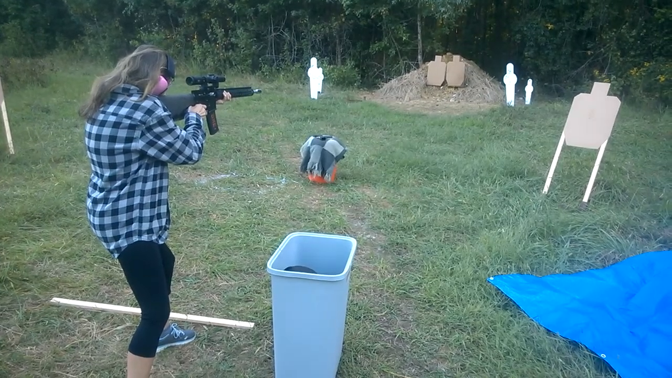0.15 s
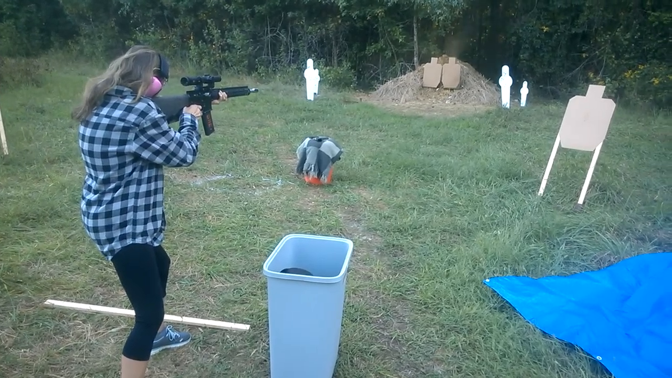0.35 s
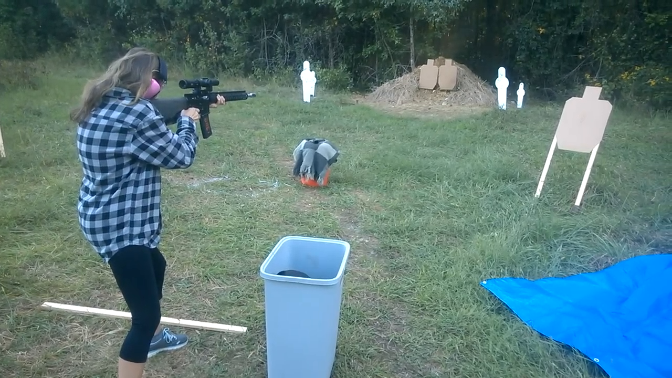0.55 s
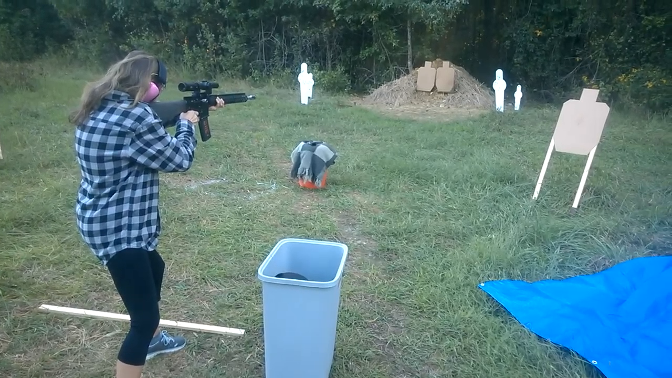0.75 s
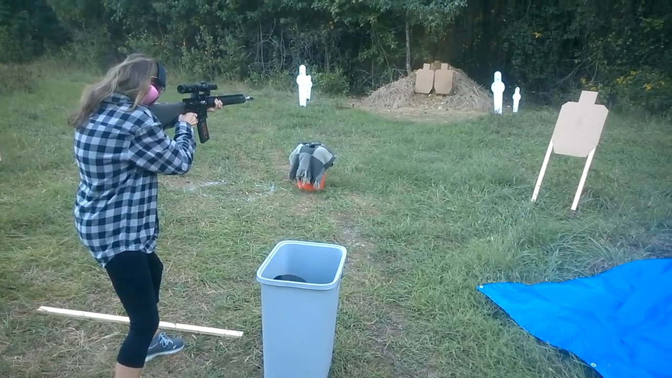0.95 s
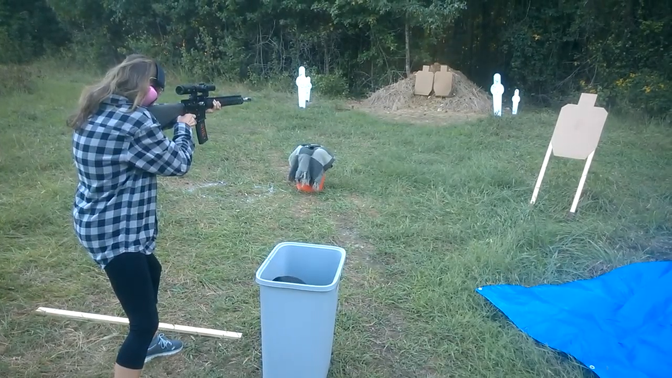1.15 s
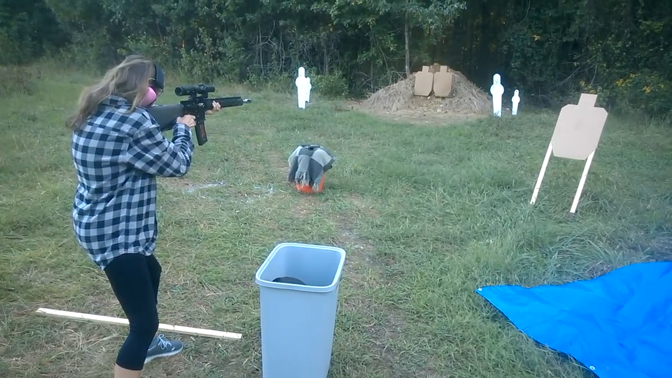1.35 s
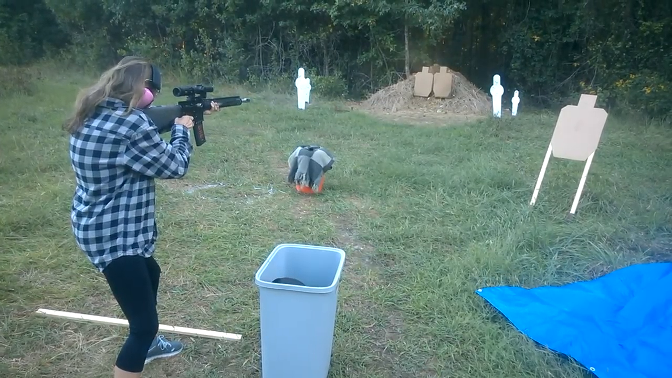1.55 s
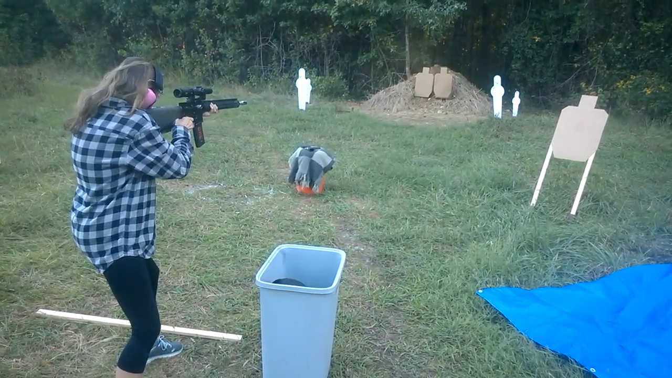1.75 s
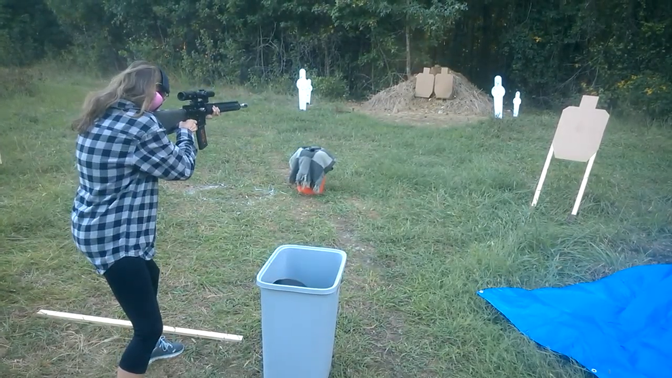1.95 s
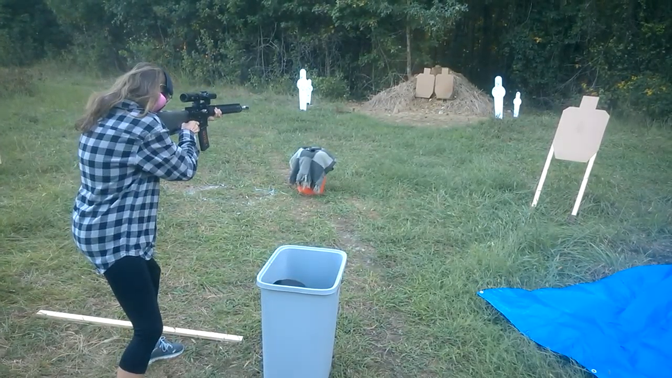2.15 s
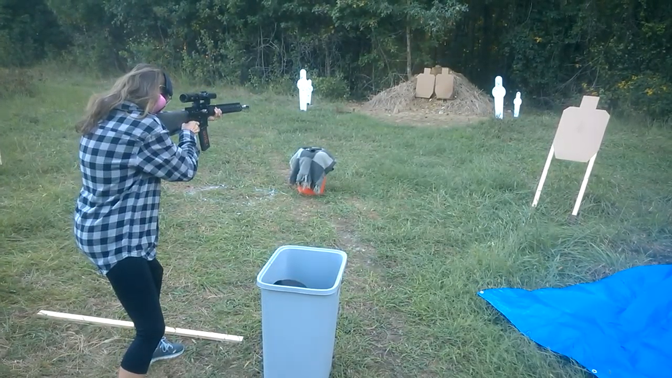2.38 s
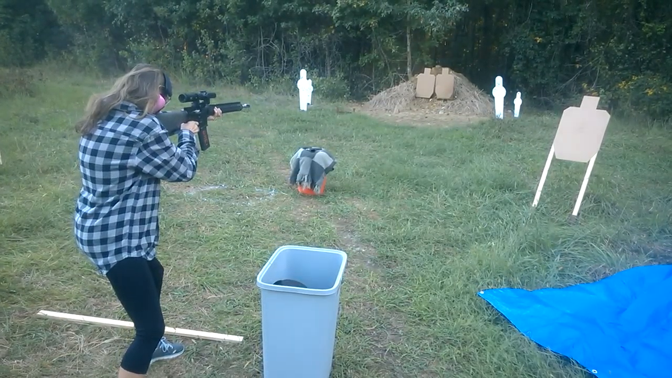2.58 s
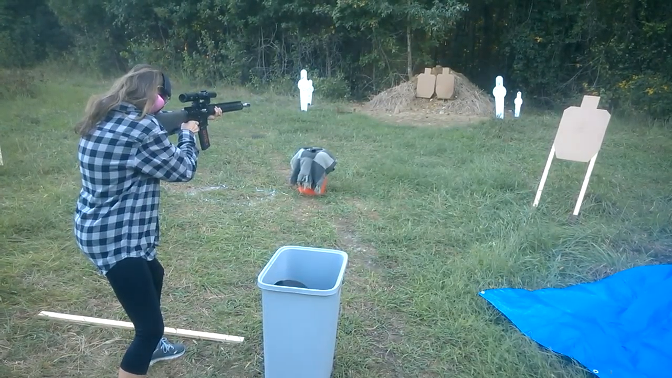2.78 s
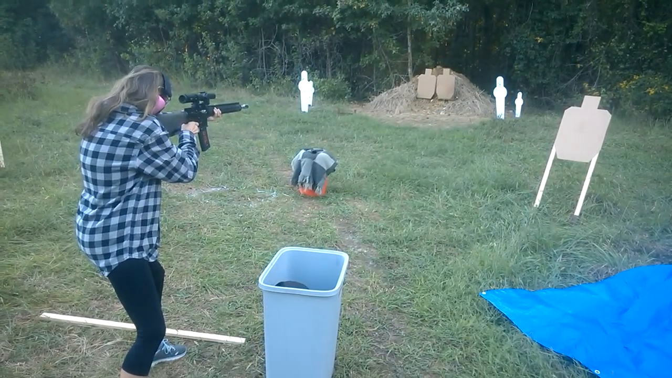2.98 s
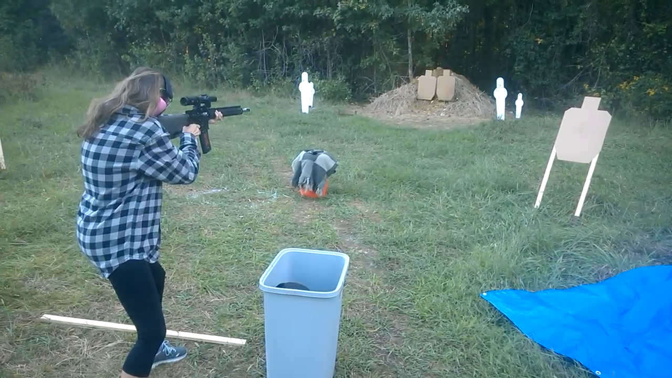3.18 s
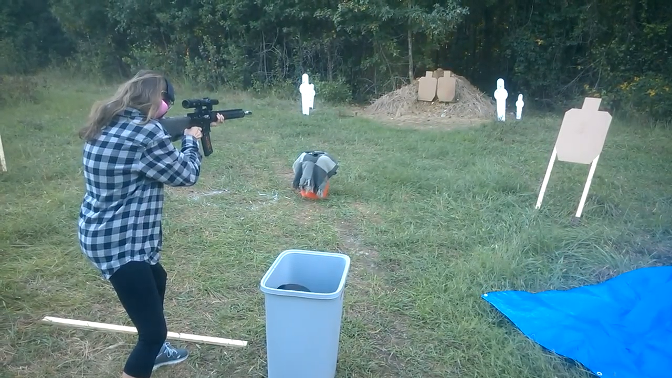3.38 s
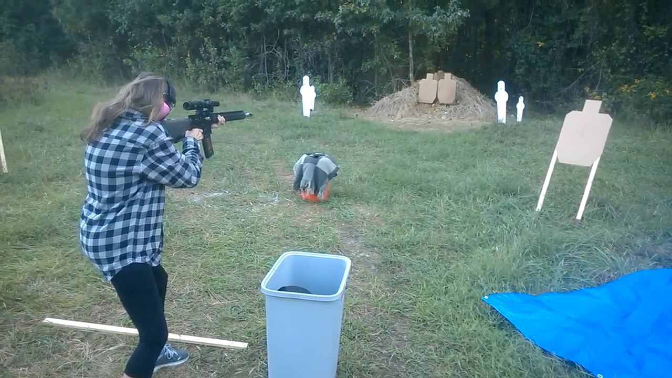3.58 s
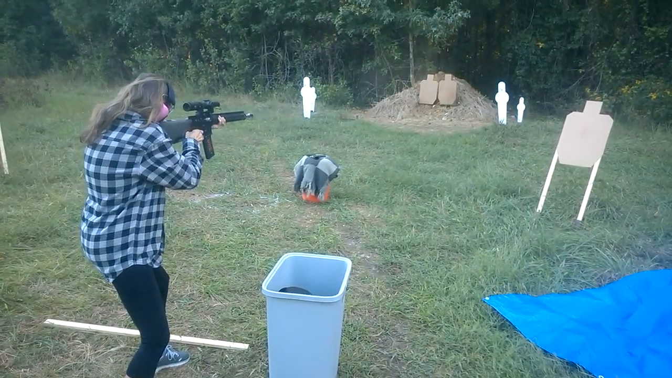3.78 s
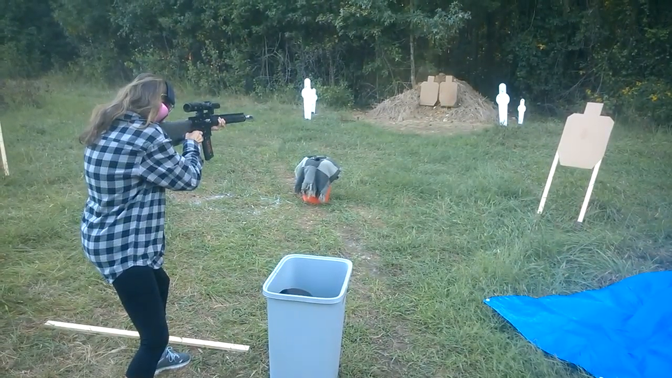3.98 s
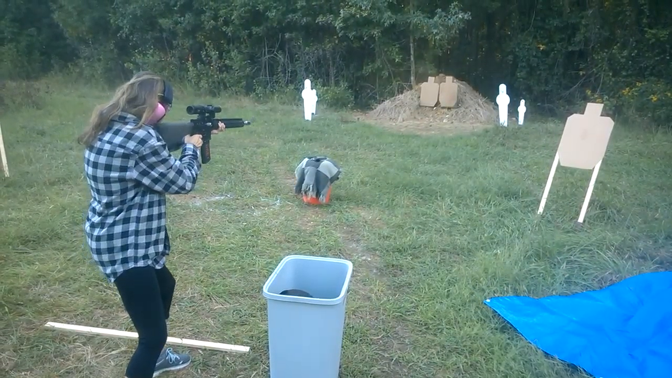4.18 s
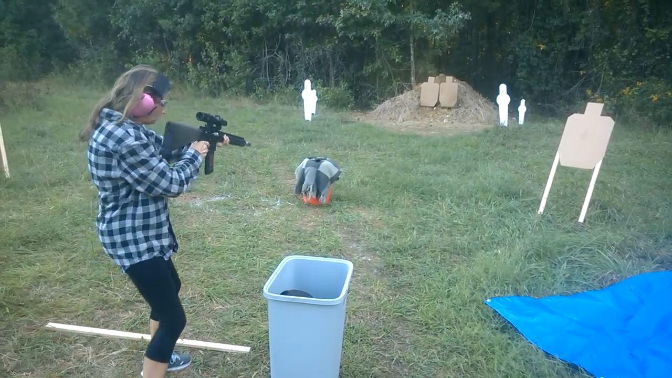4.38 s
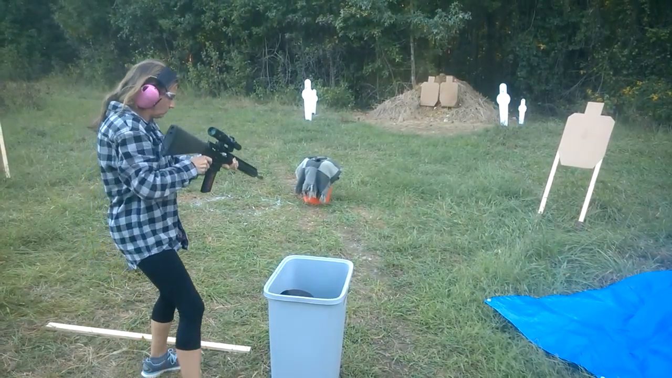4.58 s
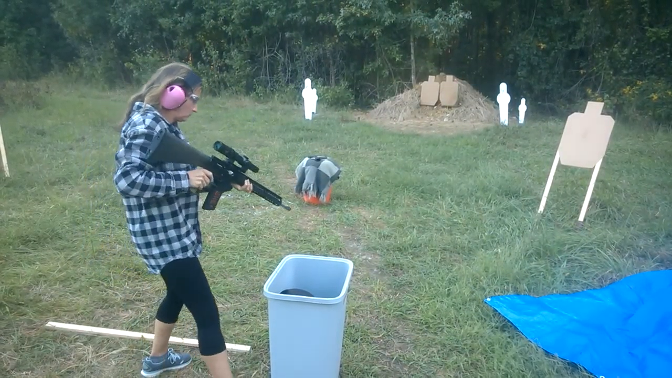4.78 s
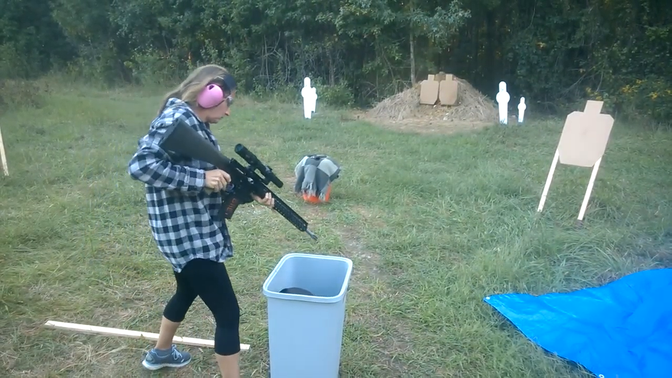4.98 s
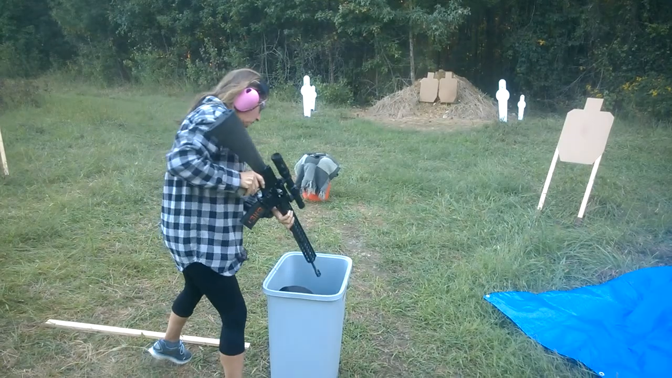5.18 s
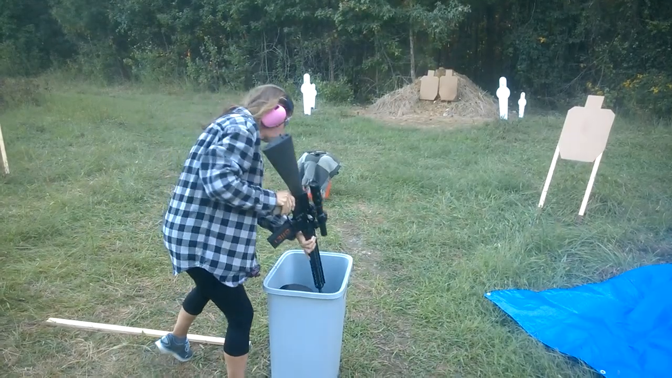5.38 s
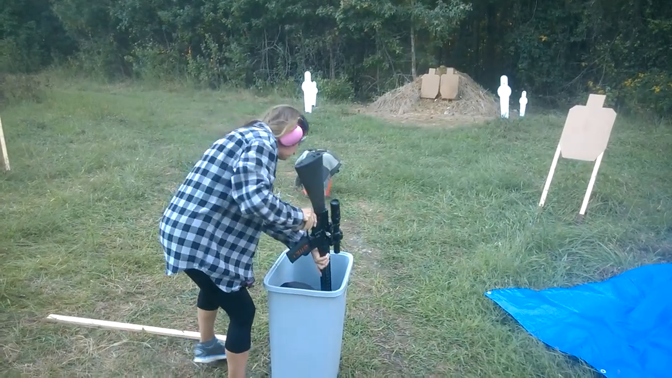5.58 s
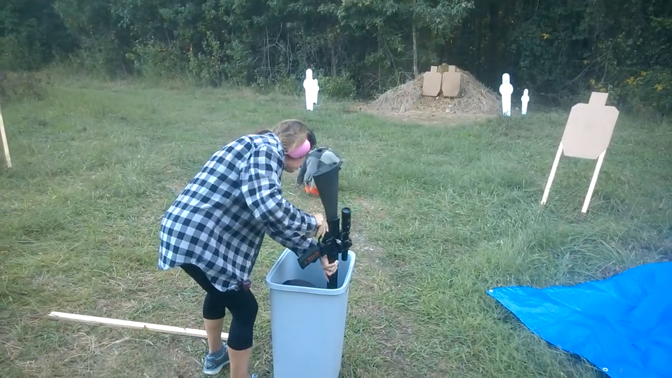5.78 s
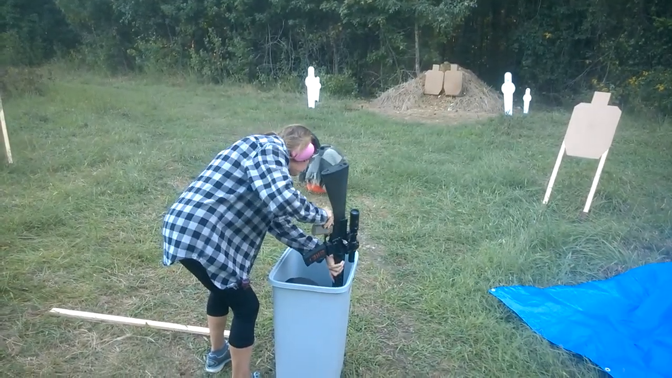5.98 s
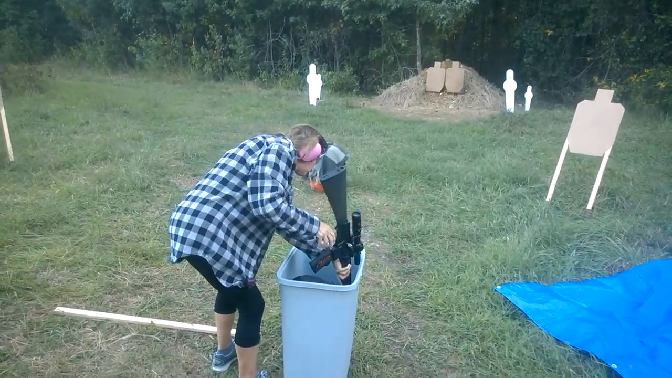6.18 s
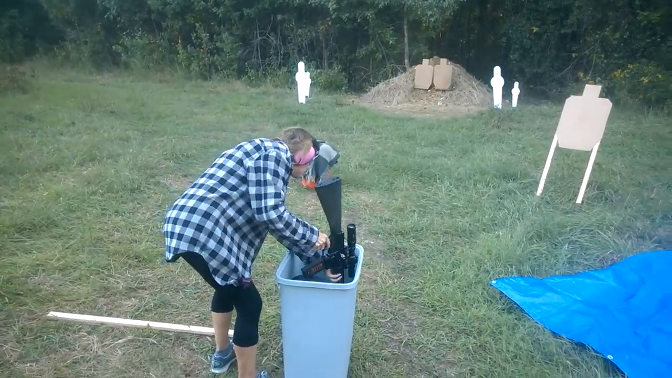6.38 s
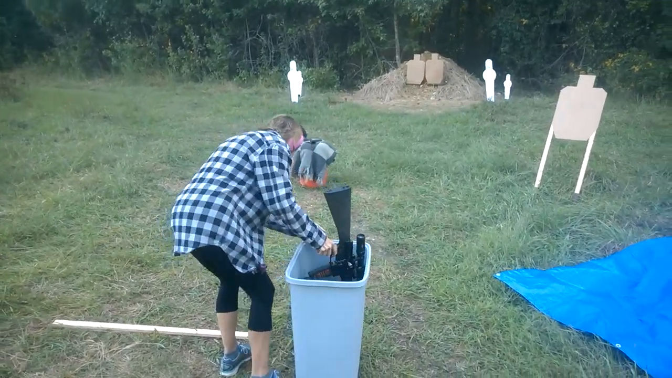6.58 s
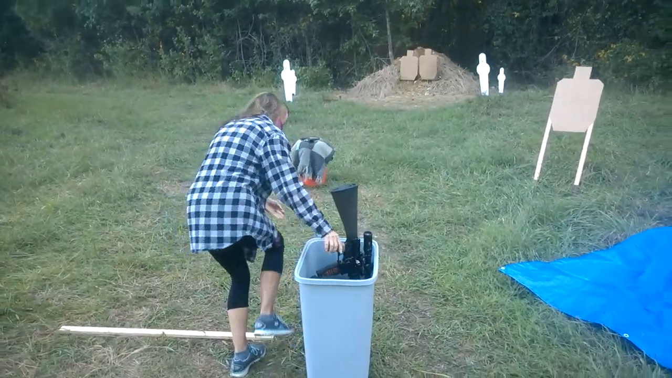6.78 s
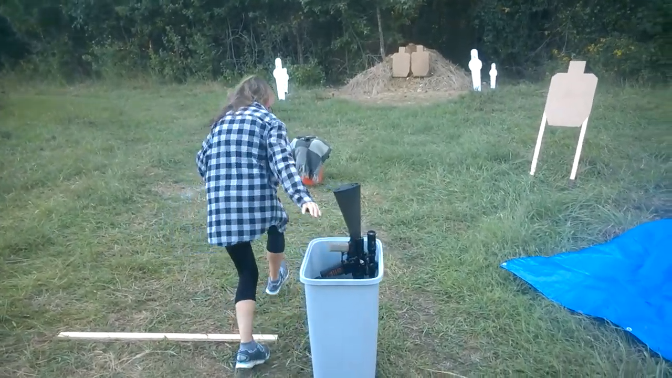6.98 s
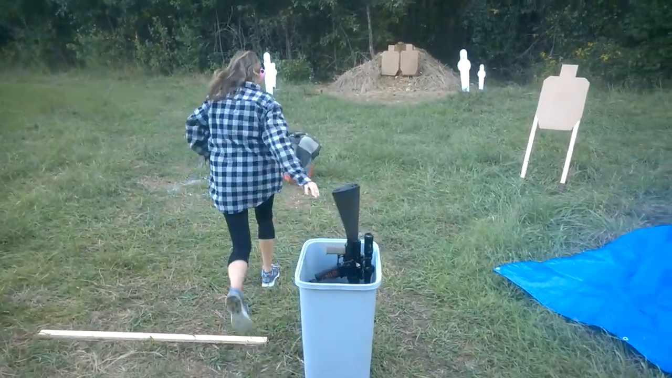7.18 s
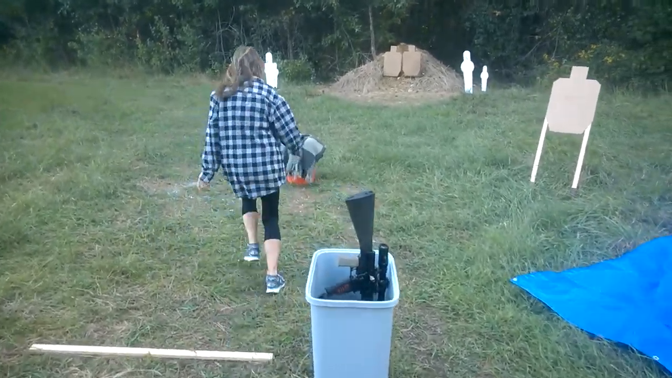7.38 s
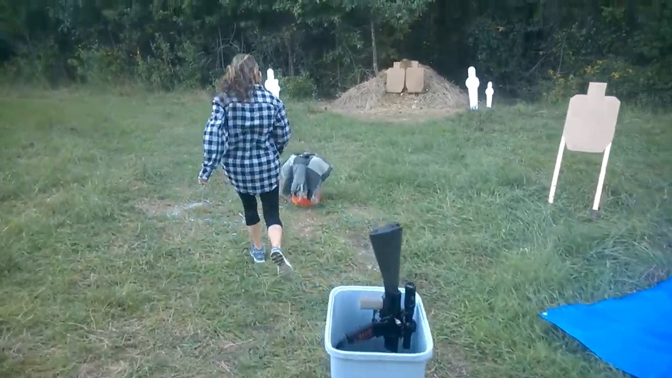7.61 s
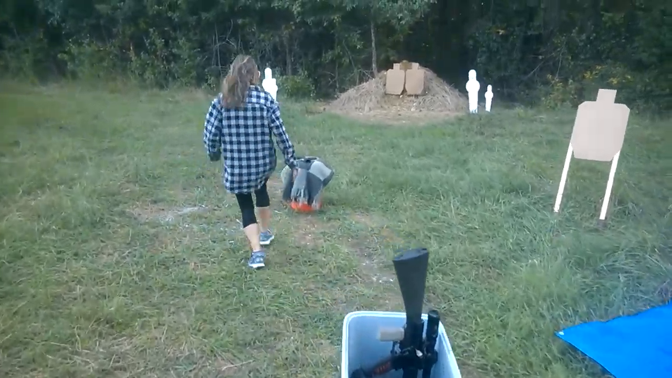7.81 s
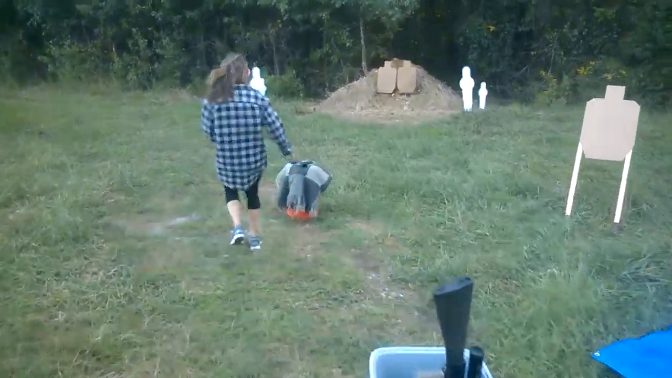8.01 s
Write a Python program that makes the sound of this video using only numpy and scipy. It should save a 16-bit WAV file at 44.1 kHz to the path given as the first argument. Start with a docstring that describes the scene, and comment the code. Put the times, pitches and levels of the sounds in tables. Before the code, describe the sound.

Four spaced rifle shots crack and roll away through trees, then the gun clatters into a plastic bin and footsteps rustle off through grass.

```python
"""A clearing among trees, where a rifle is fired four times: damped sines and gas hiss overload the input.
Bullet impacts and single slaps from reflectors are short pulses. The trees answer with a long rolling
wash of noise that dulls as it decays, and the end of one earlier echo is heard at the start.
Small metal clicks are noise bursts: spent cases landing after the shots, then rifle parts. Blows of the
rifle ring the modes of a plastic bin as the barrel drags on the rim. Steps rustle and scuff through grass,
with snapping stalks, dull thumps and a quiet field with a low hum."""
import sys
import numpy as np
from scipy import signal
from scipy.fft import rfft, irfft
from scipy.io import wavfile
from scipy.ndimage import uniform_filter1d

SR = 44100
rng = np.random.default_rng(int(sys.argv[2]) if len(sys.argv) > 2 else 0)


def persist_wave(psi):
    """Save psi, clipped to +-1, as 16-bit WAV."""
    counts = np.round(np.clip(psi, -1, 1) * 32767).astype(np.int16)
    wavfile.write(sys.argv[1], SR, np.atleast_2d(counts).T)


N = 355005  # samples in the scene


def gain_of(db):
    """Amplitude ratio: 20 dB is a factor of ten."""
    return 10 ** (np.asarray(db) / 20)


def evened(x):
    """Power normalisation: scales to rms 1."""
    return x / np.sqrt(np.mean(x ** 2) + 1e-20)


def peaked(x):
    """Peak normalisation: scales to peak 1."""
    return x / np.max(abs(x))


def read(points, hz):
    """Interpolation on a log-frequency axis, where equal steps are equal pitch ratios."""
    f, value = np.transpose(points)
    return np.interp(np.log(hz + 1), np.log(f + 1), value)


def add(mix, s, sound):
    """Superposition: adds a sound at s seconds; what lies before zero is dropped."""
    at = round(s * SR)
    sound = sound[max(-at, 0):]
    part = mix[max(at, 0):][:len(sound)]
    part += sound[:len(part)]


def coloured(spectrum, size):
    """Spectral shaping: white noise weighted by a spectrum in dB, then scaled to rms 1."""
    hz = np.fft.rfftfreq(size, 1 / SR)
    white = rfft(rng.standard_normal(size))
    return evened(irfft(white * gain_of(read(spectrum, hz)), size))


def ring(hz, t60, size=4000):
    """Damped oscillator: a sine that falls 60 dB in t60 seconds."""
    t = np.arange(size) / SR
    return np.sin(2 * np.pi * hz * t) * gain_of(-60 * t / t60)


def pulse(hz, cycles, size=2000):
    """Transient wave: a sine whose envelope peaks after the given cycles and then dies."""
    turns = np.arange(size) / SR * hz
    u = turns / cycles
    return np.sin(2 * np.pi * turns) * u * np.exp(1 - u)


def swells(start, end, start_db, end_db, edge):
    """Power sum of events that rise to their start, run straight in dB to their end and fall away."""
    rise, fall = edge  # dB per s
    t = np.arange(0, N, 32)[:, None] / SR  # one column per event
    along = np.clip((t - start) / np.maximum(end - start, 1 / SR), 0, 1)
    db = start_db + (end_db - start_db) * along
    db = db - rise * np.maximum(start - t, 0) - fall * np.maximum(t - end, 0)
    level = np.sqrt(np.sum(gain_of(db) ** 2, axis=1))
    return np.interp(np.arange(N) / SR, t[:, 0], level)


def played(level, spectrum, grain_db):
    """Friction noise: coloured noise follows a level, its amplitude roughened in grains of about 2 ms."""
    grains = gain_of(grain_db * evened(uniform_filter1d(rng.standard_normal(N), size=90)))
    return evened(coloured(spectrum, size=N) * grains) * level


def field():
    """Stationary background: the quiet field and a faint low hum are steady bands of noise."""
    # Each row: frequency in Hz, relative level in dB per Hz.
    field_band = [(12, -31.5), (20, -8.5), (49, 0), (108, -2.5), (289, -18), (652, -13), (839, -18.5),
                  (1950, -22), (2660, -27.5), (4930, -24.5), (6350, -32), (13900, -38.5), (16500, -46)]
    hum_band = [(60, -47), (76, -14.5), (85, 0.5), (96, -9.5), (120, -48)]
    field_db, hum_db = -74, -78.5  # rms
    return gain_of(field_db) * coloured(field_band, size=N) + gain_of(hum_db) * coloured(hum_band, size=N)


def thumps(cycles=0.41):
    """Low-frequency pressure transients: slow tugs of air on the microphone, swinging negative first."""
    # Each row: start in seconds, level in dB, frequency in Hz.
    tugs = [(4.936, -52, 84.6), (7.388, -62, 45.6), (7.463, -65, 45), (7.522, -52, 50), (7.608, -45, 38.3),
            (7.65, -54, 36)]
    out = np.zeros(N)
    for s, db, hz in tugs:
        add(out, s, -gain_of(db) * pulse(hz, cycles, size=8000))
    return out


def snaps(cycles=0.99):
    """Brittle fracture: stalks under a sole release short dry cracks."""
    # Each row: start in seconds, level in dB, frequency in Hz.
    stalks = [(7.198, -62, 898), (7.415, -66, 1600), (7.555, -59, 1200), (7.628, -66, 4800),
              (7.835, -67, 6000)]
    out = np.zeros(N)
    for s, db, hz in stalks:
        add(out, s, gain_of(db) * pulse(hz, cycles))
    return out


def steps_and_cloth():
    """Friction: feet swing through grass and scuff down; clothes rustle faintly in the grass colour."""
    # Each row: footfall in seconds, grass level in dB, sole level in dB.
    footfalls = [(6.924, -88, -85), (7.205, -72.5, -68.5), (7.416, -74.5, -71), (7.482, -75, -77),
                 (7.556, -74, -71), (7.625, -73, -66.5), (7.68, -80, -69), (7.836, -76, -71),
                 (7.9, -75, -77), (8.04, -71.5, -64.5)]
    # Each row: time in seconds, level in dB.
    rustles = [(1.152, -79.5), (1.301, -84.5), (1.41, -79), (2.369, -79.5), (2.56, -75.5), (3.596, -80.5),
               (4.97, -82)]
    # Spectra of grass and soles. Each row: frequency in Hz, relative level in dB per Hz.
    grass_band = [(1470, -31), (2500, -4), (3090, -6.5), (4520, -2), (7730, -2), (13800, -7.5),
                  (15900, -14.5), (16500, -21.5)]
    sole_band = [(80, -28), (150, -1.5), (400, -5), (900, -10), (1600, -4.5), (2300, -10.5), (2900, -26),
                 (4000, -59.5)]
    swish, scuff, rustle = (74, 304), (153, 450), (85, 80)  # rise and fall, dB per s
    s, db = np.transpose(rustles)
    cloth_level = swells(s, s, db, db, rustle)
    s, grass_db, sole_db = np.transpose(footfalls)
    grass_level = swells(s, s, grass_db, grass_db, swish)
    sole_level = swells(s, s, sole_db, sole_db, scuff)
    grass = played(cloth_level + grass_level, grass_band, grain_db=1.5)
    return grass + played(sole_level, sole_band, grain_db=3.0)


def drag():
    """Sliding friction: the barrel drags on the rim of the bin as grainy coloured noise."""
    # Each row: start in seconds, end in seconds, level at the start in dB, level at the end in dB.
    drags = [(6.25, 6.313, -80, -63.5), (6.388, 6.425, -60, -85), (6.53, 6.552, -70, -84.5),
             (6.591, 6.655, -77, -74), (6.658, 6.706, -75, -67), (6.713, 6.714, -48, -59),
             (6.716, 6.742, -74, -81)]
    # Each row: frequency in Hz, relative level in dB per Hz.
    rim = [(530, -46), (900, -9), (1180, -3), (1410, -27.5), (1650, -11), (2030, -15), (2470, -22),
           (4020, -3.5), (5320, -21.5), (7040, -21), (10400, -38), (15200, -31), (16500, -38.5)]
    edge = (4000, 2000)  # rise and fall, dB per s
    return played(swells(*np.transpose(drags), edge), rim, grain_db=4.0)


def knocks():
    """Modal synthesis: each blow rings the bin and rattles loose parts; hard blows wake high modes more."""
    # The rifle knocks the bin. Each row: start in seconds, peak in dB, hardness in dB.
    blows = [(6.225, -43, -18), (6.245, -44, -23), (6.3864, -35, -19), (6.407, -38.5, -25),
             (6.526, -67, -4), (6.538, -52, -10), (6.658, -26.5, -24), (6.675, -27.5, -18.5),
             (6.689, -42.5, -6), (6.71, -42, -14), (6.735, -46, -16.5)]
    # Modes of the bin. Each row: mean frequency in Hz, relative level in dB, t60 in seconds.
    modes = [(55, -12, 0.15), (99, -8, 0.099), (171, -1.5, 0.066), (301.4, -12, 0.038), (554, -7.5, 0.041),
             (720, -15, 0.031), (956, -6.5, 0.024), (1302, -22, 0.019), (1800, -18, 0.025),
             (3450, -27, .025), (4110, -29, .025), (7650, -35, 0.018), (9800, -35, .02)]
    # Loose parts. Each row: frequency in Hz, relative level in dB per Hz.
    rattle = [(150, -31), (250, 7), (401, -24), (656, 2.5), (999, -13.5), (1880, -10), (2620, -27),
              (3650, -14.5), (5970, -42), (7760, -33), (11000, -51), (15100, -31), (16500, -52)]
    level_spread_db, pitch_spread = 2.5, .04  # of each mode from blow to blow; pitch as a share
    out, t = np.zeros(N), np.arange(4096) / SR
    contact = np.clip(t / 0.001, 0, 1)  # the wall gives for 1 ms
    for s, db, hard_db in blows:
        blow = gain_of(hard_db + 11.5 - 60 * t / 0.076) * coloured(rattle, size=len(t))
        for (hz, mode_db, t60), (tune, share, side) in zip(modes, rng.standard_normal((len(modes), 3))):
            bright = np.clip(np.log2(hz / 400) / 1.9, 0, 1)
            level_db = mode_db + bright * (hard_db + 6) + level_spread_db * share
            mode = ring(hz * (1 + pitch_spread * tune), t60, size=len(t))
            blow = blow + np.sign(side) * gain_of(level_db) * mode  # either polarity
        add(out, s, gain_of(db) * peaked(contact * blow))
    return out


def clicks():
    """Two-stage decay: noise bursts in the colour of small metal parts die fast over a fainter tail."""
    # Small metal clicks: spent cases landing after the shots, then rifle parts.
    # Each row: start in seconds, peak in dB, t60 in seconds, tilt in dB per octave.
    ticks = [(.9134, -43, .02, -10), (2.1294, -59, 0.018, 2), (3.2894, -60, .02, 0),
             (4.4817, -54, 0.017, 4), (5.9264, -60, .025, -6), (5.9372, -59, 0.019, -7),
             (6.009, -31.5, 0.012, -2), (6.0514, -62, .02, -4), (6.225, -62, 0.016, -4),
             (6.3865, -55.5, 0.016, -6), (6.537, -64, .015, -2), (6.66, -62, .03, 0), (6.678, -46, .05, -5),
             (6.692, -54, .05, 2), (6.712, -55, .02, -12)]
    # Metal before the tilt. Each row: frequency in Hz, relative level in dB per Hz.
    metal = [(710, -39), (1200, -7), (1760, 5), (2670, -22), (3590, 8), (4240, -15), (4620, 6), (5700, -20),
             (6940, 2), (9230, 3.5), (14000, -10), (15300, -6), (16500, -30)]
    out, t = np.zeros(N), np.arange(4096) / SR
    for s, db, t60, tilt_db in ticks:
        colour = [(hz, level_db + tilt_db * np.log2(hz / 4000)) for hz, level_db in metal]
        fall = gain_of(-60 * t / t60) + gain_of(-23.5 - 60 * t / 0.087)
        add(out, s, gain_of(db) * peaked(fall * coloured(colour, size=len(t))))
    return out


def echo_level(now, blast_db, lull_db, near_db, trees_db, *falls):
    """Staged decay: blast rings out, near things fill the lull, trees answer, each stage falls at its pace."""
    ring_out_s, trees_s, arrive_s = 0.015, 0.077, 0.013  # the arrival is counted from trees_s
    front_s, belt_s, far_s = .19, 0.42, 1.06  # after the shot
    stages = np.array([trees_s + arrive_s, front_s, belt_s, far_s, now[-1]])
    late_db = trees_db - np.cumsum(np.append(0, np.diff(stages) * falls))
    times = [0, ring_out_s, trees_s, *stages]
    return gain_of(np.interp(now, times, [blast_db, lull_db, near_db, *late_db]))


def wash(place):
    """Diffuse scattering: the place repeats its pattern, stirred most in the treble by moving air."""
    # Rows are boom, trunks, leaves. Each row: level at the blast in dB, in the lull in dB, just before the
    # trees answer in dB, as they answer in dB, then the fall in dB per s of front row, belt of trees,
    # beyond it, far woods. Levels are relative to the echo gain of the shot.
    layers = [(-43.5, -35.5, -30, -34, 16, 32, 45, 11), (-14.5, -29, -28, -20.5, 8, 13, 36, 18),
              (-25, -31.5, -22.5, -18.5, 87, 38.7, 49.5, 38)]
    # Spectra of the three layers. Each row: frequency in Hz, relative level in dB per Hz.
    boom = [(15, -46.5), (25, -24.5), (139, 1.5), (182, 0), (251, -5.5), (300, -3.5), (390, -26.5),
            (660, -120)]
    trunks = [(190, -45), (330, -13), (464, -4.5), (598, -1.5), (1000, -2), (1310, -6), (1820, -7),
              (2200, -19.5), (2860, -48.5), (4840, -120)]
    leaves = [(1410, -34), (2400, -9.5), (3060, -2), (3560, -5), (4470, -3), (4960, -5.5), (14000, -14.5),
              (16000, -23), (16500, -51.5)]
    # Loss in air and foliage, which shifts the colour only. Each row: frequency in Hz, loss in dB per s.
    air = [(60, 2), (250, 14.5), (400, 3.5), (700, -1.5), (1100, 2), (1800, 9), (2300, 11), (3000, 20.5),
           (5000, 40), (8000, 55.5), (12000, 89.5), (16000, 104)]
    # Likeness of the echo from shot to shot. Each row: frequency in Hz, share of the fixed pattern (0 to 1).
    likeness = [(200, .95), (1000, .85), (3000, .5), (8000, .2)]
    hz, t, pattern = signal.stft(place, SR, nperseg=1024)
    stirred = signal.stft(rng.standard_normal(len(place)), SR, nperseg=1024)[2]
    same = read(likeness, hz)[:, None]
    scattered = same * pattern + np.sqrt(1 - same ** 2) * stirred  # keeps the power
    now, out = np.arange(len(place)) / SR, 0
    for spectrum, row in zip((boom, trunks, leaves), layers):
        colour = gain_of(read(spectrum, hz)[:, None] - read(air, hz)[:, None] * t)
        colour /= np.sqrt(np.mean(colour ** 2, axis=0))  # colour only; the level follows
        layer = signal.istft(scattered * colour, SR, nperseg=1024)[1][:len(place)]
        out = out + layer * echo_level(now, *row)
    return out


def slaps(cycles=0.5, smear=2.0, spread_db=3.0):
    """Discrete reflection: boards, berm and trunks return short pulses, far ones smeared over more cycles."""
    # Each row: delay after the shot in seconds, mean level in dB before the echo gain, frequency in Hz.
    reflectors = [(.0652, -5.5, 1150), (.0875, -15, 1150), (.0925, -16, 760), (.1565, -22, 760),
                  (.1965, -22, 1040), (.2095, -9.5, 598), (.2305, -14, 635), (.3335, -21.5, 805),
                  (.3775, -19, 580), (.4195, -18, 724), (.4405, -21, 630)]
    out = np.zeros(SR)
    for (delay, db, hz), chance in zip(reflectors, rng.standard_normal(len(reflectors))):
        add(out, delay, gain_of(db + spread_db * chance) * pulse(hz, cycles + smear * delay))
    return out


def strikes(spit_s=0.0024, cycles=0.8):
    """Impact radiation: a bullet throws a hiss of splinters, then board and berm whack over a thud."""
    # Hisses of splinters. Each row: start in seconds, peak in dB.
    spits = [(0.279, -8.5), (1.4848, -9), (2.6445, -8.5), (3.8018, -5.5)]
    # Splinters. Each row: frequency in Hz, relative level in dB per Hz.
    splinters = [(880, -37.5), (1500, 5.5), (4050, -2), (5470, -4), (7850, -0.5), (13200, -14.5),
                 (15100, -8), (16500, -25)]
    # Each row: start in seconds, whack level in dB, whack frequency in Hz, thud level in dB.
    whacks = [(.2830, -7.5, 1000, -23.5), (0.2919, -10, 1054, -31), (1.489, -4, 1030, -22.5),
              (1.4965, -14, 1030, -30), (2.6522, -7.5, 1083, -14), (2.658, -6, 1200, -30),
              (3.805, -8, 1167, -21.5), (3.8139, -7.5, 1040, -29.5)]
    thud_hz = 208
    out, t = np.zeros(N), np.arange(512) / SR
    u = t / spit_s
    for s, db in spits:
        add(out, s, gain_of(db) * peaked(u * np.exp(1 - u) * coloured(splinters, size=len(u))))
    for s, db, hz, thud_db in whacks:
        add(out, s, gain_of(db) * pulse(hz, cycles) + gain_of(thud_db) * pulse(thud_hz, cycles))
    return out


def thinned(x):
    """Destructive interference: the ground bounce cancels deep bass, modelled by a high-pass."""
    ground_hz = 149
    return signal.lfilter(*signal.butter(2, ground_hz, "high", fs=SR), x)


def blast(pitch_hz, edge_db):
    """Shock and jet noise: damped waves of muzzle and ground bounce, a hard edge and the gas hiss."""
    # Rows are front, main wave, low push, ground bounce, with levels relative to the blast gain.
    # Each row: delay in seconds, level in dB, factor on the blast pitch, t60 in seconds.
    waves = [(0, -12, 1.3, .004), (.0008, 2, 1.05, .0062), (.0012, -8, .36, .012), (.0038, -8, .85, .01)]
    edge_delay, edge_hz, edge_t60 = .001, 2100, .0045  # s, Hz, s
    hiss_delay, hiss_db, hiss_t60 = .0012, -9, .004  # s, dB relative to the blast gain, s
    out, t = np.zeros(4000), np.arange(1000) / SR
    rise = np.minimum(t / .0008, 1)  # over 0.8 ms
    for delay, db, factor, t60 in waves:
        add(out, delay, gain_of(db) * rise * ring(pitch_hz * factor, t60, size=len(t)))
    add(out, edge_delay, gain_of(edge_db) * rise * ring(edge_hz, edge_t60, size=len(t)))
    hiss = np.gradient(rng.standard_normal(len(t)))
    add(out, hiss_delay, gain_of(hiss_db - 60 * t / hiss_t60) * hiss)
    return out


def rifle():
    """Direct sound plus reflections: every shot with its bullet impacts, slaps and scattered wash."""
    # Each row: start in seconds, blast gain in dB, echo gain in dB, blast pitch in Hz,
    # level of the hard edge in dB relative to the blast gain.
    shots = [(0.2334, 3, 1.5, 926, -5), (1.4384, 5.5, 1, 740, -0.5), (2.5984, 4.5, 0.5, 892, 1),
             (3.755, -2, -0.5, 720, 1)]
    earlier_s, earlier_db = 1.8, 0.46  # one more shot before the start, and its echo gain
    pulses, echoes = strikes(), np.zeros(N)
    place = rng.standard_normal(3 * SR)  # one scattering pattern for all shots
    add(echoes, -earlier_s, gain_of(earlier_db) * wash(place))  # only the end of its echo is left
    for s, blast_db, echo_db, pitch_hz, edge_db in shots:
        add(pulses, s, gain_of(blast_db) * blast(pitch_hz, edge_db))
        add(pulses, s, gain_of(echo_db) * slaps())
        add(echoes, s, gain_of(echo_db) * wash(place))
    return thinned(pulses) + echoes


def scene():
    """Superposition of the quiet field, walking, small metal and bin sounds, and shots in one channel."""
    background = field() + thumps()
    walking = steps_and_cloth() + snaps()
    contacts = drag() + knocks() + clicks()
    return (background + walking + contacts + rifle())[None]


def record(dry):
    """Saturation and band limiting: the input clips with a short knee, then a low-pass follows."""
    clip, band_hz = .7, 16200  # amplitude, Hz
    clipped = dry / (1 + abs(dry / clip) ** 8) ** (1 / 8)
    low_pass = signal.firwin(511, band_hz, window=("kaiser", 9), fs=SR)
    return signal.oaconvolve(clipped, low_pass[None], "same")


dry = scene()
out = record(dry)
persist_wave(out)
```